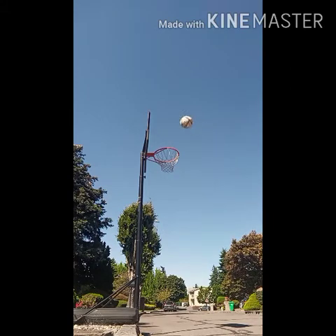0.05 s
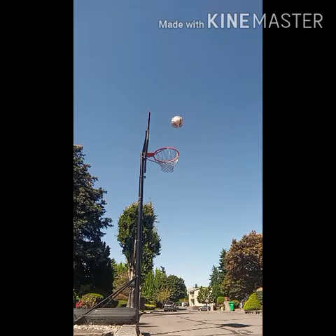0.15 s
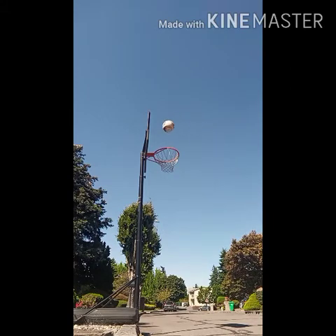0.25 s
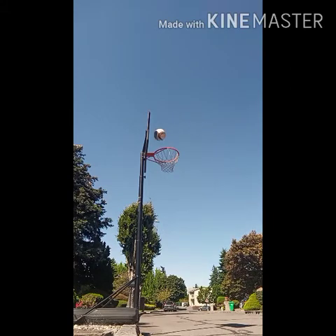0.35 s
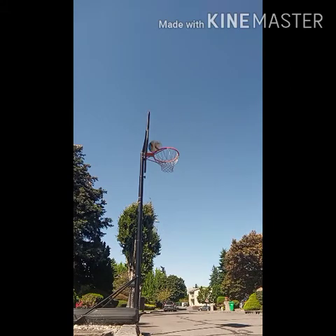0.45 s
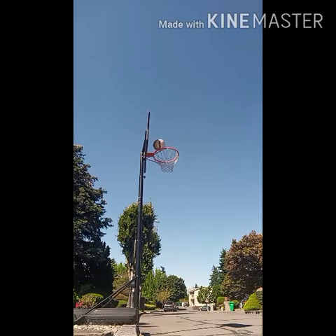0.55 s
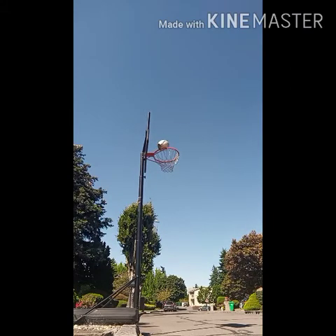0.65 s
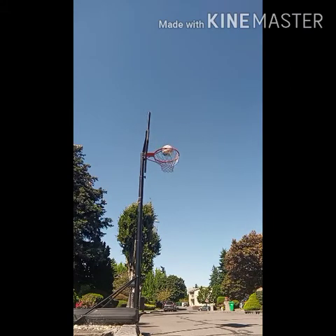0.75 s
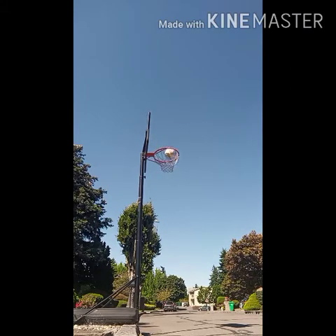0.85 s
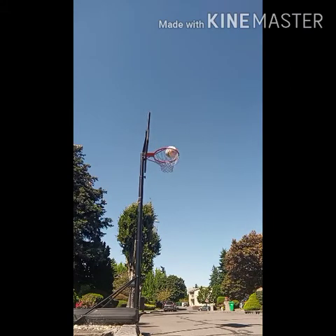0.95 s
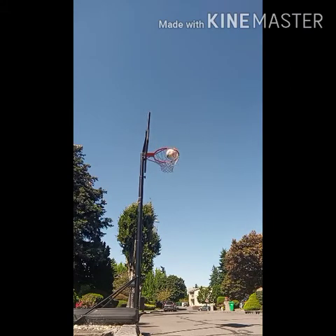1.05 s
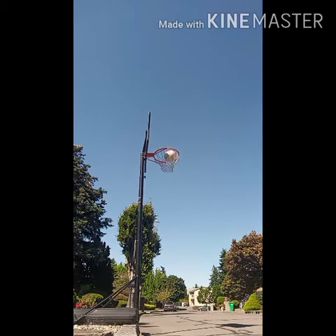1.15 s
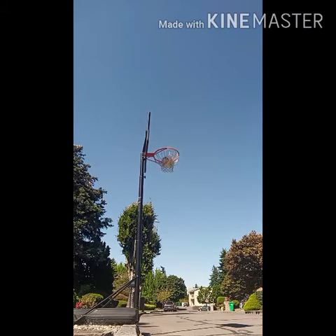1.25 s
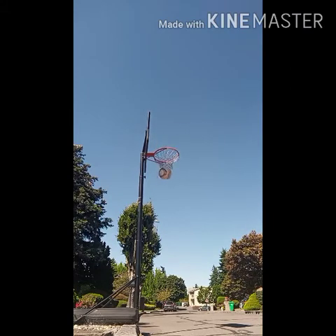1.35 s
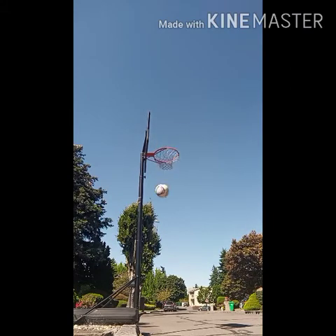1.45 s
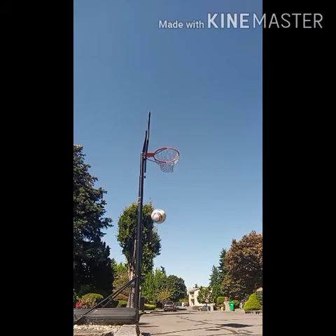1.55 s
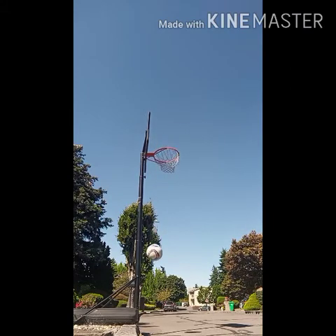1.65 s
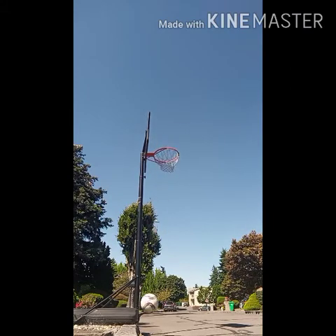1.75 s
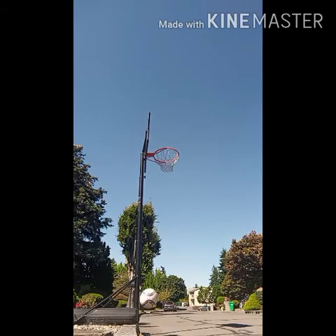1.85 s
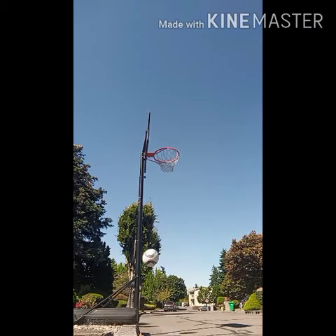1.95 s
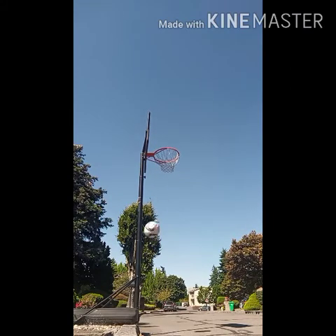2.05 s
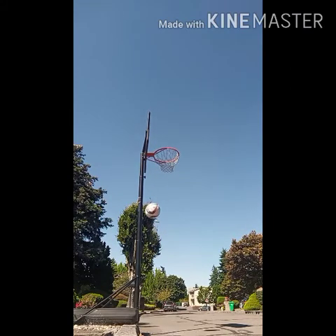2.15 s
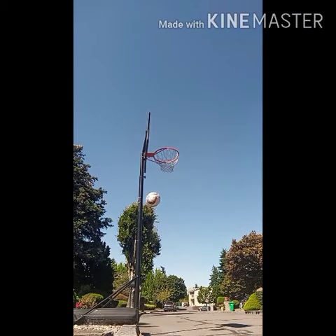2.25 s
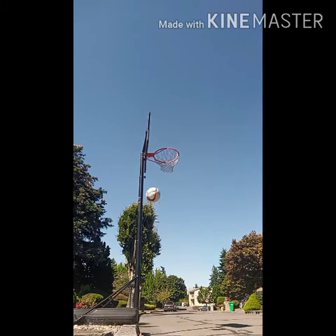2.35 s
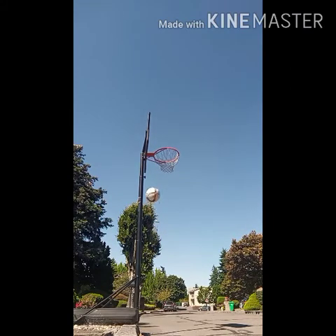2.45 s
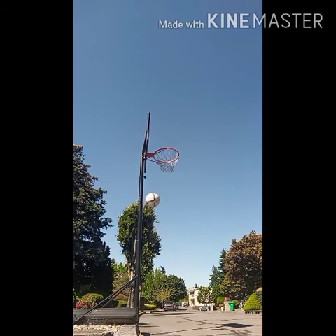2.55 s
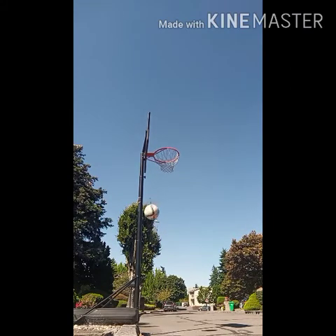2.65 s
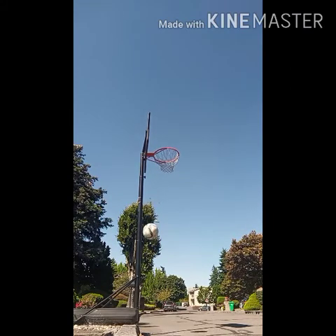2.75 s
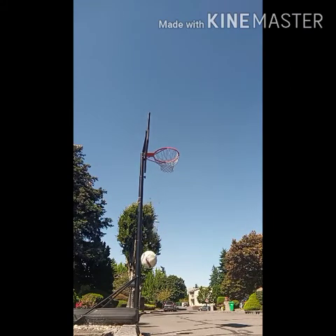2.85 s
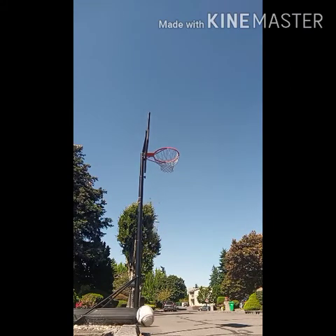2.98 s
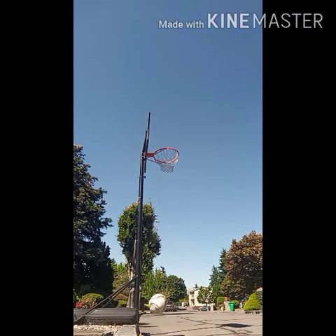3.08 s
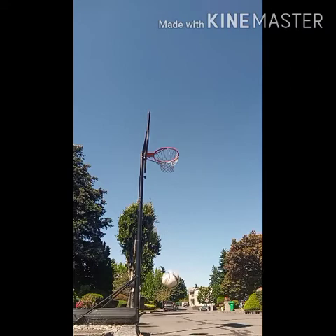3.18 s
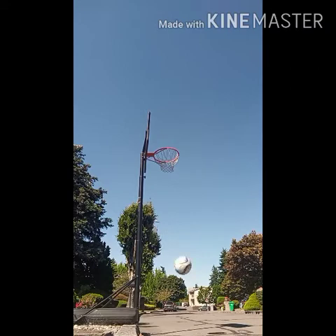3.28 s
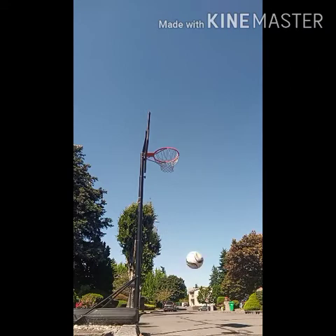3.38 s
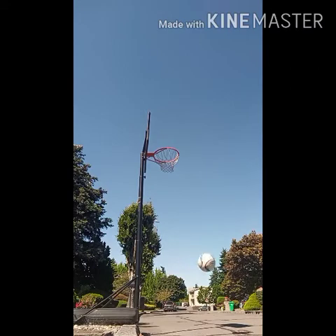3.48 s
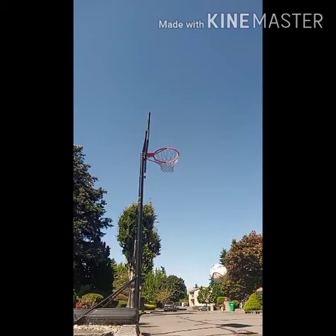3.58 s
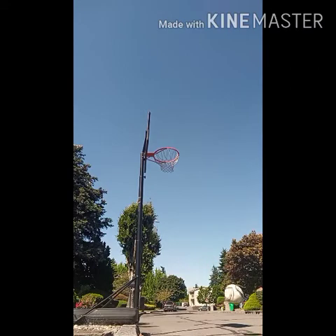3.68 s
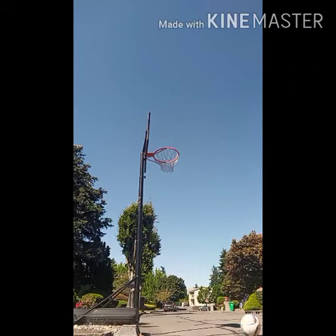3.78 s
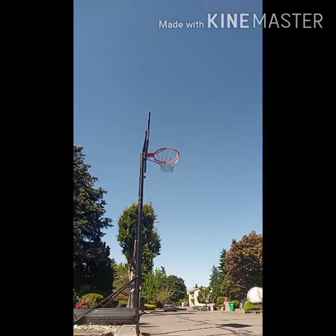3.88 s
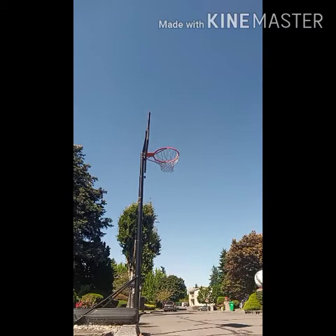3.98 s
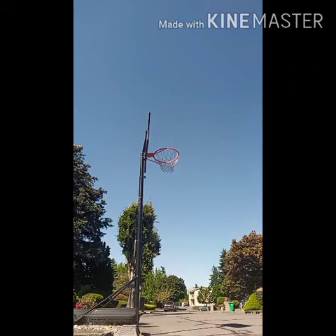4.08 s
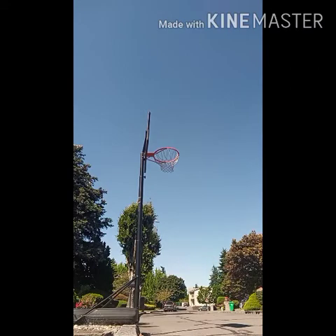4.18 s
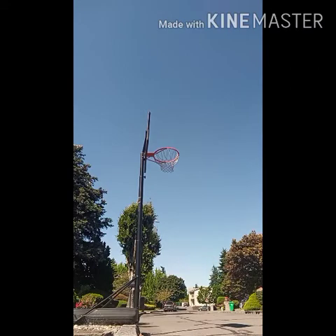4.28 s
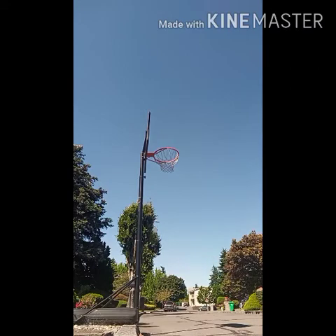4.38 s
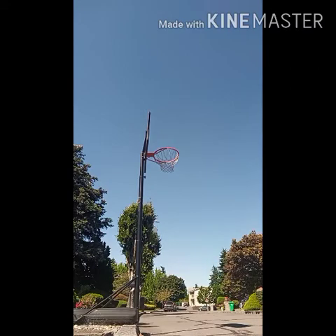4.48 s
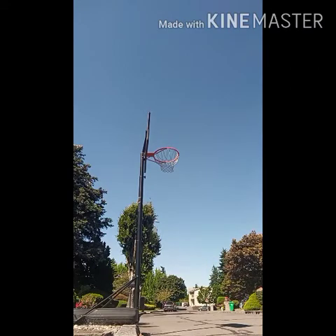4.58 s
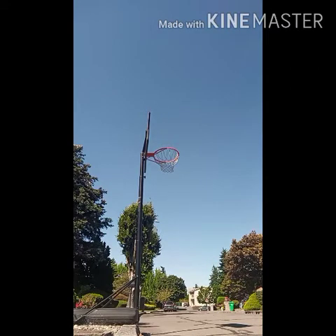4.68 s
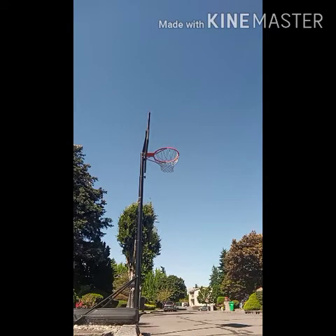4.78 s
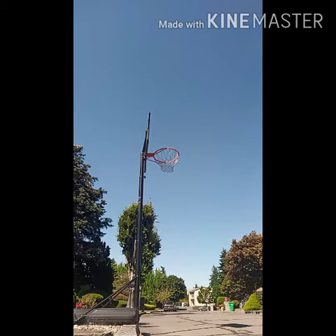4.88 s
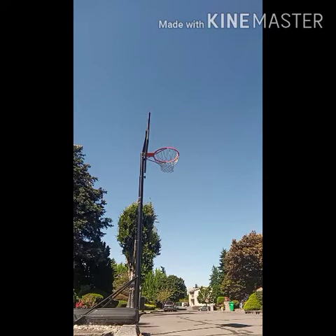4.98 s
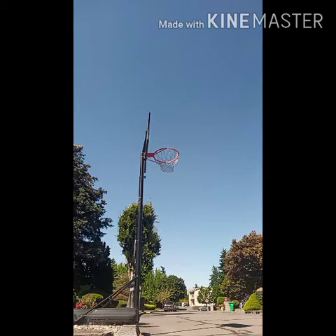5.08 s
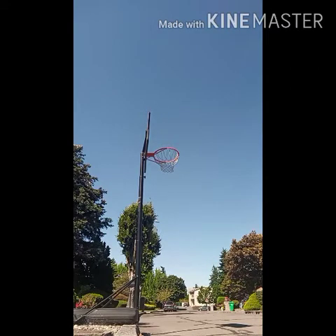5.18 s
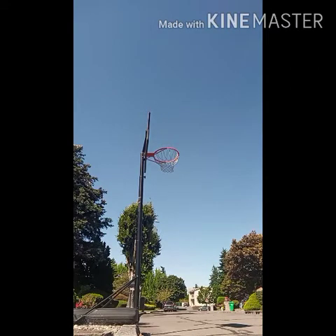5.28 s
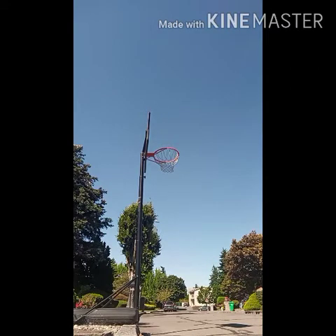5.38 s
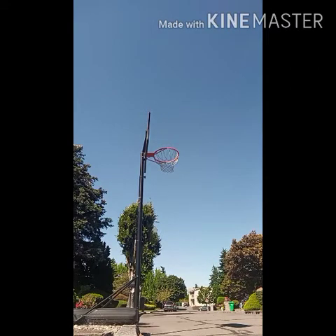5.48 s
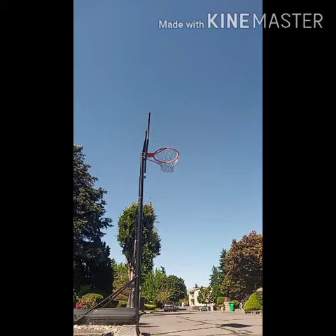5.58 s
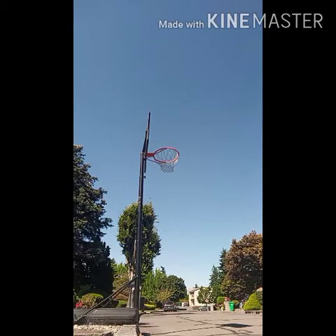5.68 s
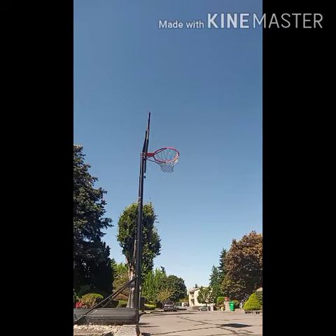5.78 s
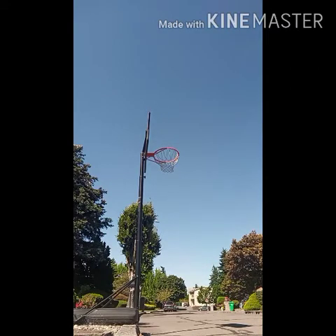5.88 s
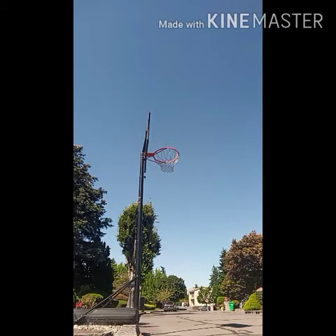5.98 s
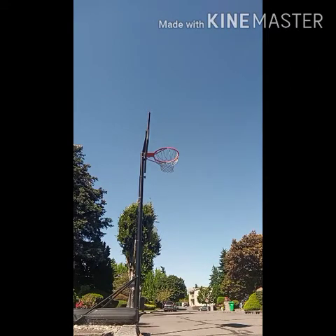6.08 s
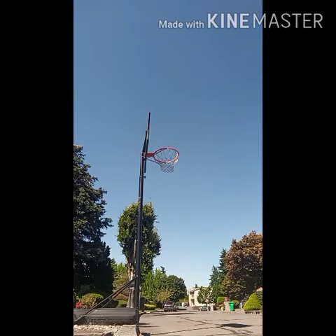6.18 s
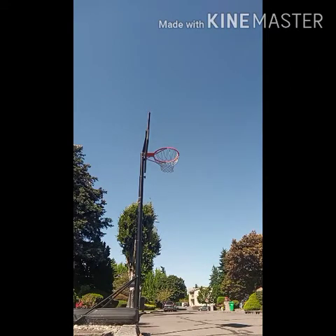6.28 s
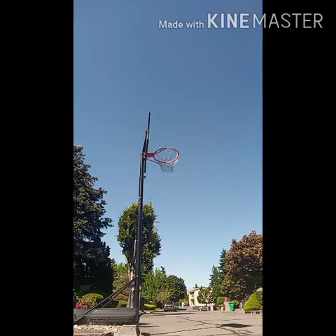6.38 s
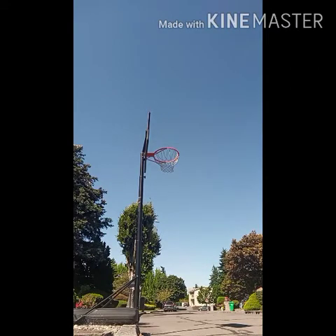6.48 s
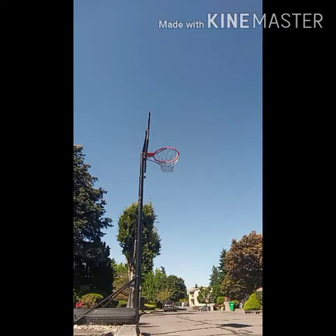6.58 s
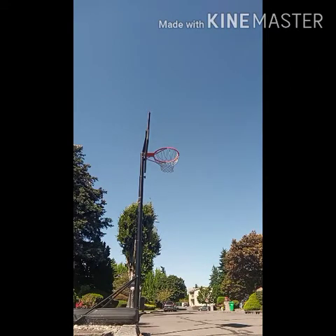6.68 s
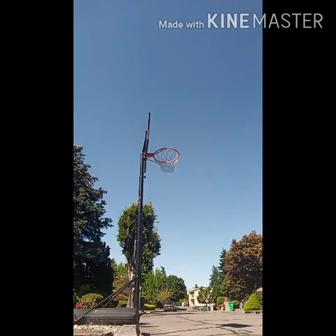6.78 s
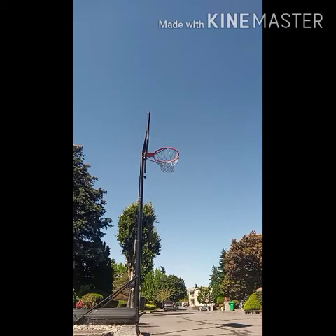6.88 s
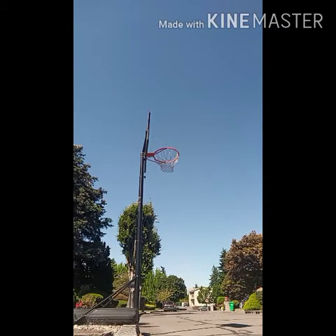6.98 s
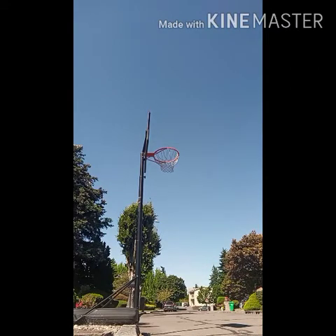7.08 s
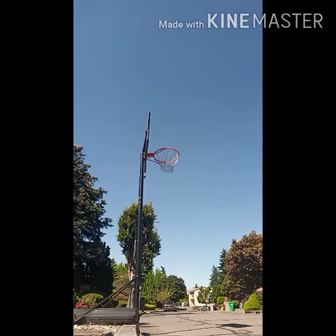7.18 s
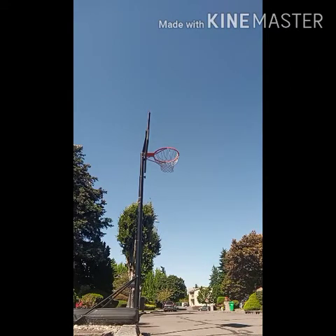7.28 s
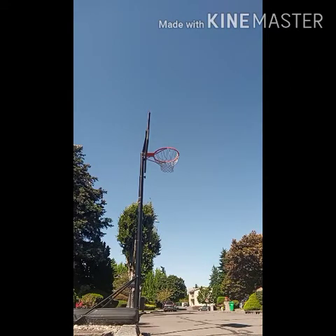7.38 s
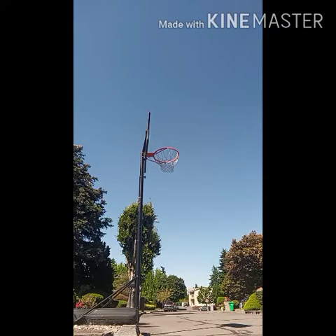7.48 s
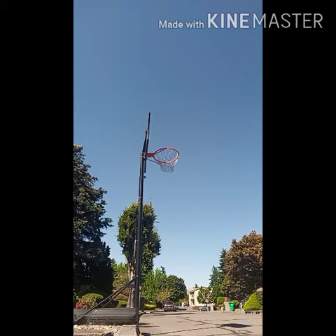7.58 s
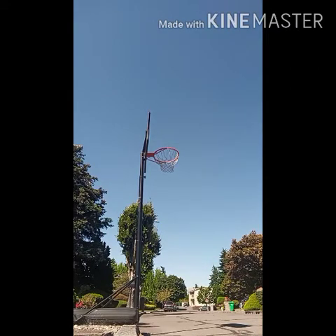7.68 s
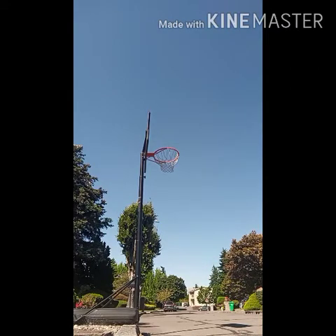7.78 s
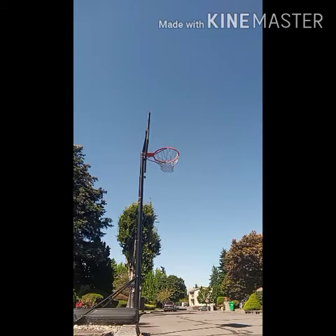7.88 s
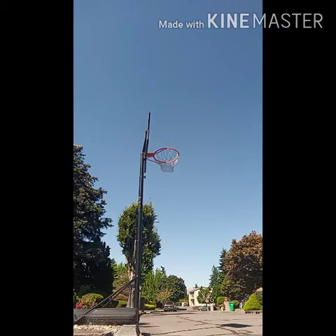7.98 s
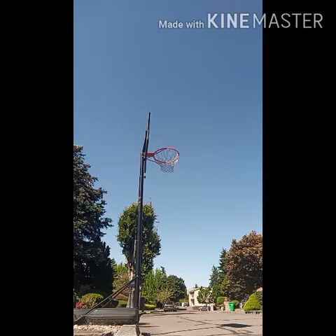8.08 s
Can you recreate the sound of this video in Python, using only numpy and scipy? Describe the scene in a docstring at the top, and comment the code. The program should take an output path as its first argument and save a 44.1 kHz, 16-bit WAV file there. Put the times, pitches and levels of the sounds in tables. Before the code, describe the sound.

A quiet paved street outdoors, with low distant traffic swelling gently and faint microphone hiss throughout. At about 0.5 s a ball strikes the hoop: dull board knocks and a loose metallic rattle until 0.7, then a brighter, stronger clank near 0.97 trailing into soft net and rim jingling until 1.4. A near-silent drop follows. At 1.9 the ball lands with the loudest slap, a crisp smack over a short low thump, with house-front echoes. Around 3.1 a dry knock, scuffing hiss and softer landing shake the stand, which rattles until 3.5. Further hollow bounces come at 3.9, 4.6, 4.95, 5.8, 6.5, 6.9, 7.3, 7.7 and 8.0, generally weaker and finally closer together. Sharp hard knocks stand out at 4.4 and 6.45, with fainter ones later. Small hissy scuffs appear, and the echo grows as the ball recedes.

```python
"""Far traffic hums throughout as filtered noise. A ball rattles through a hoop on a stand: bursts
of noise ring the steel and the board. It drops and bounces away over a paved street, each bounce
a slap, a low thump and a softer slap, with dry knocks in between. The hoop shakes once more, short
soft bursts of hissy noise come now and then, and house fronts send slaps and knocks back."""
import sys
import numpy as np
from scipy import signal
from scipy.fft import rfft, irfft
from scipy.io import wavfile
from scipy.ndimage import uniform_filter1d

SR = 44100
rng = np.random.default_rng(int(sys.argv[2]) if len(sys.argv) > 2 else 0)


def wav_record(signal):
    """Record a signal, one row per channel, as 16-bit PCM in the file named by sys.argv[1]."""
    frames = np.transpose(np.atleast_2d(signal))
    bounded = np.clip(frames, -1, 1)
    # unit amplitude maps onto the largest positive 16-bit level
    quanta = np.round(bounded * 32767).astype(np.int16)
    wavfile.write(sys.argv[1], SR, quanta)


N = 358974

# thin, very high fizz, peaking near 15 kHz: (frequency [Hz], relative level per Hz [dB])
FIZZ = [(4410, -31.5), (7500, -4), (8460, -5), (11900, -9), (13500, -16), (14600, -4), (15000, -9.5),
        (15600, 0), (16300, -19)]


def amp(db):
    """Turns decibels into a gain."""
    return 10 ** (np.asarray(db) / 20)


def evened(x):
    """Scales a sound to an rms (average strength) of one."""
    return x / np.sqrt(np.mean(x ** 2) + 1e-20)


def read(points, hz):
    """Reads levels between the points of a table, on a log frequency axis."""
    table_hz, value = np.transpose(points)
    return np.interp(np.log(hz + 0.0016), np.log(table_hz), value)


def add(mix, s, sound):
    """Mixes a sound in at time s, in seconds."""
    part = mix[round(s * SR):][:len(sound)]
    part += sound[:len(part)]


def coloured(x, points):
    """Shapes x by a spectrum table and silences everything outside the table."""
    hz = np.fft.rfftfreq(len(x), 1 / SR)
    inside = (hz > points[0][0]) & (hz < points[-1][0])
    return irfft(rfft(x) * amp(read(points, hz)) * inside, len(x))


def uneven(x, uneven_db, width_hz=320):
    """Puts random bumps across the spectrum, so no two events share quite the same colour."""
    hz = np.fft.rfftfreq(len(x), 1 / SR)
    bumps = np.interp(hz / width_hz, np.arange(200), rng.standard_normal(200))
    return irfft(rfft(x) * amp(uneven_db * bumps), len(x))


def patchy(points, patch_db):
    """Makes steady noise whose spectrum drifts in patches of time and frequency."""
    frames, hz = N // 256 + 5, np.fft.rfftfreq(1024, 1 / SR)
    real, imag, patches = rng.standard_normal((frames, 513, 3)).T
    patches = uniform_filter1d(patches, size=3, axis=0)  # smooth over frequency
    patches = evened(uniform_filter1d(patches, size=8, axis=1))  # smooth over time
    level_db = read(points, hz)[:, None] + patch_db * patches
    below_top = (hz < points[-1][0])[:, None]
    spectrum = (real + 1j * imag) * amp(level_db) * below_top
    return evened(signal.istft(spectrum, nperseg=1024, noverlap=768)[1][:N])


def fade(t, t60, hold=0, rise=0.00047):
    """Rises quickly, holds until time hold, then falls by 60 dB in t60 (at least 2 ms)."""
    return np.clip(t / rise, 0, 1) * amp(-60 * np.maximum(t - hold, 0) / max(t60, .002))


def ringing(x, modes):
    """Sends x through resonances, each a natural pitch that rings longer the narrower it is."""
    total = 0
    for hz, width_hz, db in modes:
        radius = np.exp(-np.pi * width_hz / SR)
        angle = 2 * np.pi * hz / SR
        ring = signal.lfilter([1], [1, -2 * radius * np.cos(angle), radius * radius], x)
        total = total + amp(db) * (1 - radius) * np.sin(angle) * ring
    return total


def traffic():
    """Tyre roar from two roads swells and sinks over a low rumble."""
    # far traffic: (time [s], tyre roar [dB], duller roar [dB])
    swells = [(0, -60, -67.5), (.5, -59, -63.5), (1.1, -58, -67.5), (1.52, -56.5, -60.5),
              (1.8, -60.5, -74.5), (2.1, -59.5, -55), (2.4, -61.5, -58), (2.74, -63.5, -58),
              (3.001, -61.5, -63), (3.3, -60, -58), (3.7, -62.5, -67.5), (4.3, -59, -67.5),
              (4.901, -64, -74), (5.4, -65, -72), (6.251, -66, -70), (6.699, -62, -65), (7.499, -58.5, -66),
              (8.14, -59.5, -63.5)]
    # colours of the two roars and the rumble: (frequency [Hz], relative level per Hz [dB])
    roar_colour = [(290, -47), (500, -22.5), (632, -16.5), (833, -1.5), (924, 2), (1040, 3.5), (1440, -8),
                   (1570, -27), (2600, -48), (3380, -66.5), (5720, -120)]
    dull_colour = [(300, -26), (450, -13), (540, -6.5), (640, -5.5), (760, 0), (880, -2.5), (1000, -14.5),
                   (1300, -27)]
    rumble_colour = [(12, -50), (20, -20.5), (86, 8.5), (195, 6), (258, -5.5), (343, 1.5), (512, -13),
                     (700, -25), (910, -38.5), (1540, -120)]
    s, roar_db, dull_db = np.transpose(swells)
    t = np.arange(N) / SR
    roar = amp(np.interp(t, s, roar_db)) * patchy(roar_colour, patch_db=4.0)
    dull_roar = amp(np.interp(t, s, dull_db)) * patchy(dull_colour, patch_db=6.0)
    rumble = amp(-69.5) * patchy(rumble_colour, patch_db=3.0)
    return roar + dull_roar + rumble


def echo(sound, near_db, far_db):
    """Adds house-front echoes: each wall scatters the sound back as a decaying cloud of noise."""
    # near and far house fronts: (delay [ms], relative level [dB], t60 of the scattered return [ms])
    near_walls = [(9.9, 1.5, 110), (21.3, 4, 90), (58.7, -6, 116)]
    far_walls = [(92, -19.5, 380), (131, -22, 270), (263, -24, 190)]
    # colour of the echo: (frequency [Hz], relative level [dB])
    street = [(60, -4.5), (150, 0.5), (500, 5), (1200, -2), (2000, 0.5), (2800, 1.5), (4200, 3),
              (5400, 1.5), (6600, 4.5), (8000, 4), (12000, -6)]
    t = np.arange(SR // 2) / SR
    walls = [(ms, db + near_db, t60_ms) for ms, db, t60_ms in near_walls]
    walls += [(ms, db + far_db, t60_ms) for ms, db, t60_ms in far_walls]
    power = sum((amp(db) * fade(t - ms / 1000, t60_ms / 1000, rise=0.0078)) ** 2
                for ms, db, t60_ms in walls)
    cloud = coloured(rng.standard_normal(len(t)), street)
    tail = evened(uneven(cloud, uneven_db=1.5)) * np.sqrt(power)
    wet = amp(-32) * signal.fftconvolve(sound, tail)
    wet[:len(sound)] += sound  # the direct sound
    return wet


def wetter_db(s):
    """Raises the echo as the ball goes off toward the houses."""
    away_s, rise_db_per_s = 5.4, 1.5
    return rise_db_per_s * max(s - away_s, 0)


def shaken(rows, bright, rise_s, t60, fizz_db, lumpy_db):
    """Each event drives three streams of noise: bright and lumpy, slow and low, quick fizz."""
    soft_rise = .15  # share of the hold: long events start gently
    out = np.zeros((3, N))
    t = np.arange(SR // 3) / SR
    for s, high_db, low_db, centre_hz, hold_ms in rows:
        high, low, fizz, lumps = rng.standard_normal((4, len(t)))
        rise = rise_s + soft_rise * hold_ms / 1000
        hold = rise + hold_ms / 1000
        # each event has its own colour around its centre
        part = [(centre_hz / 4, -30), (centre_hz / 1.5, -9), (centre_hz, 0),
                (centre_hz * 1.5, -5), (centre_hz * 5, -16)]
        high = coloured(coloured(high, part), bright)
        high = evened(uneven(high, uneven_db=4))
        lumps = amp(lumpy_db * evened(uniform_filter1d(lumps, 100)))
        add(out[0], s, amp(high_db) * high * lumps * fade(t, t60, hold, rise))
        add(out[1], s, amp(low_db) * low * fade(t, 1.8 * t60, hold, rise + 0.0013))
        add(out[2], s, amp(high_db + fizz_db) * fizz * fade(t, 0.72 * t60, hold, rise))
    return out


def hissy_bursts():
    """Short soft bursts of hissy noise, some with a dull low part."""
    # bursts: (time [s], hiss [dB], relative level of the low part [dB],
    # centre of the hiss filter [Hz], hold [ms])
    bursts = [(1.82, -77.5, -54.5, 5700, 4.3), (3.089, -61, -41, 5400, 16.5), (3.338, -77, -63.5, 6200, 4.),
              (3.367, -63.5, -59.5, 5500, 15), (4.385, -82.5, -86, 5000, 47), (4.817, -70.5, -64, 5740, 5),
              (4.835, -67, -57.5, 5350, 7.6), (5.897, -73.5, -74, 4300, 11.3), (6.43, -84, -69, 5050, 14),
              (7.12, -83, -71, 4500, 5), (7.185, -83, -69, 4900, 31)]
    # colours of the hiss and the low part: (frequency [Hz], relative level per Hz [dB])
    hiss_colour = [(1060, -11), (1800, 33.5), (2250, -109), (2490, 8.5), (5500, -1), (6430, 5), (7260, -31),
                   (9000, -4), (11700, -56), (19800, -120)]
    low_colour = [(60, -19.5), (120, 5), (250, -27), (500, -11.5), (1200, -17.5), (2000, -37)]
    high, low, fizz = shaken(bursts, hiss_colour, rise_s=0.0013, t60=0.077, fizz_db=-6, lumpy_db=4.0)
    return high + amp(17.5) * coloured(low, low_colour) + coloured(fizz, FIZZ)


def hoop():
    """Chattering joints ring the steel and the board, which sound on after each shake."""
    # hoop, net and stand shaken by the ball: (time [s], relative rattle level [dB],
    # relative board level [dB], centre of the rattle filter [Hz], hold [ms])
    shakes = [(0.5299, -45.5, -57, 3200, 11), (0.5666, -42.5, -43, 3740, 9.5), (0.583, -58, -42, 4500, 14),
              (0.62, -54.5, -42.5, 4200, 25), (0.6654, -44.5, -49, 3780, 7.4), (0.7044, -58, -81, 3980, 12),
              (0.9213, -54, -52.5, 5400, 14), (0.9376, -50, -50.5, 4960, 9.4),
              (0.9698, -39.5, -44, 3770, 31), (0.9836, -32.5, -36.5, 5220, 10.5),
              (1.031, -47, -45, 3400, 13), (1.0934, -53, -78, 4650, 27), (1.1444, -57, -73, 4800, 46),
              (1.1775, -63, -74, 6400, 14), (1.2333, -56.5, -67, 3620, 14), (1.297, -62, -63, 4400, 6.3),
              (1.347, -61, -71, 4180, 27), (1.392, -51, -61, 3990, 3.6), (3.1347, -62, -37.5, 3070, 3.6),
              (3.185, -77, -70, 5500, 40), (3.2714, -65, -45.5, 3420, 29), (3.302, -63.5, -51.5, 3380, 8.2),
              (3.478, -68.5, -69, 5030, 48)]
    # unpitched part of the rattle, then its fizz: (frequency [Hz], relative level per Hz [dB])
    clatter = [(1060, 31), (1800, 7), (1960, -54), (2030, -20.5), (2660, -4.5), (3130, -9), (6090, -12.5),
               (8190, -25), (9000, -19.5), (11700, -39), (19800, -120)]
    fizz_colour = [(4120, -37), (7000, -4.5), (7700, 0), (8240, -23), (9590, -16), (10400, -19),
                   (12800, -31), (14300, -28), (15200, -12), (16000, -8.5), (16300, -46)]
    # steel ring and brackets, then board and pole: (frequency [Hz], width [Hz], relative level [dB])
    rim = [(2640, 29.5, 0), (3510, 24, 0), (3390, 10.6, 16), (3930, 37, 6.5), (3940, 14, -14),
           (4160, 18, 7), (4810, 31, 3), (5180, 25, 4), (5270, 40, -21), (5530, 54, -4), (5500, 16, -1),
           (5700, 21.4, 11), (6320, 23, -5.5), (6570, 89, 11.5), (6460, 45, -1.5), (7500, 40, -31),
           (8940, 37, -18.5), (9300, 50, -28.5)]
    board_modes = [(139, 36.6, -11), (178, 49, 2), (242, 66, 0.5), (342, 61, -6), (386, 23, -4),
                   (564, 140, -12), (793, 80, -5)]
    # what a soft ball can push into the board: (frequency [Hz], relative level [dB])
    shove = [(70, -29), (120, -7), (900, -8), (1500, -30)]
    high, low, fizz = shaken(shakes, clatter, rise_s=0.00086, t60=0.13, fizz_db=-26.5, lumpy_db=3.5)
    steel = high + amp(3) * ringing(high, rim)
    board = ringing(coloured(low, shove), board_modes)
    return amp(-12.5) * steel + amp(23.0) * board + coloured(fizz, fizz_colour)


def slap(modes, ring_db, crack_db, fizz_db=-120, pitch=1, rise=0.00028, pressed=0):
    """A brief ring under a crack of two surfaces meeting; a faint crunch lasts while they are pressed."""
    # colour of the crack: (frequency [Hz], relative level per Hz [dB])
    crack_colour = [(1120, -18), (1900, -28.5), (2100, -50.5), (2600, 6), (3140, 0), (3730, 1.5), (4590, 2),
                    (6120, 3.5), (8090, -28), (11800, -28.5), (13300, -61), (14900, -31.5), (16300, -34.5)]
    t = np.arange(4096) / SR
    detune = 1 + .03 * rng.standard_normal(len(modes))
    ring = sum(amp(db) * np.sin(2 * np.pi * hz * pitch * d * t) * fade(t, t60, rise, rise)
               for (hz, db, t60), d in zip(modes, detune))
    # soft rubber rounds the first edge
    ring = signal.sosfilt(signal.butter(2, 3200, fs=SR, output="sos"), ring)
    crack_noise, fizz_noise = rng.standard_normal((2, len(t)))
    crunch = fade(t, 0.0091, rise, rise) + amp(-20.0) * fade(t, 0.013, pressed)
    crack = evened(coloured(crack_noise, crack_colour)) * crunch
    fizz = evened(coloured(fizz_noise, FIZZ)) * fade(t, 0.04)
    return amp(ring_db) * ring + amp(crack_db) * crack + amp(fizz_db) * fizz


def knocks(mix):
    """Adds dry knocks without a thump, on the board first, later on something hard and light."""
    # knocks: (time [s], knock [dB], crack [dB], pitch factor)
    hits = [(0.5338, -40, -54, 1.15), (.541, -39.5, -75, 1.25), (.668, -47, -48.5, 0.78),
            (0.968, -44.5, -59, 1.07), (3.0986, -38, -55, 1.1), (4.4169, -26, -41, 1.15),
            (6.4554, -30, -55, 1.14), (6.724, -53, -55.5, 1.19), (7.2194, -41, -77, 0.88),
            (7.477, -58, -60, 1.1)]
    # ring of the thing struck, before the pitch factor: (frequency [Hz], relative level [dB], t60 [s])
    knock_modes = [(400, -11.5, 0.0038), (570, -5, 0.015), (767, 2, 0.0085), (1306, -5, 0.02)]
    for s, knock_db, crack_db, pitch in hits:
        echo_db = -13 + wetter_db(s)
        knock = slap(knock_modes, knock_db, crack_db, pitch=pitch, rise=0.00105)
        add(mix, s, echo(knock, echo_db, echo_db))


def bounce(slap_db, thump_db, thump_hz, overtone_db, crack_db, fizz_db, contact_ms):
    """Slap on landing, a thump as the ball squashes and springs back, a softer slap as it peels off."""
    # air and skin of the ball: (frequency [Hz], relative level [dB], t60 [s])
    ball_modes = [(1252, 1.5, 0.013), (976, -9, 0.036), (1588, -20.5, 0.084), (457.3, -16, 0.069),
                  (680, -12.5, 0.023)]
    t = np.arange(4096) / SR
    peel_s = contact_ms / 1000 - .0008  # peeling starts just before contact ends
    lift_db = -6.5 - (contact_ms - 8.5)  # softer by 1 dB for each ms of longer contact
    sound = slap(ball_modes, slap_db, crack_db, fizz_db, pressed=peel_s)
    turn = 2 * np.pi * thump_hz * np.maximum(t - .0007, 0)  # the squash builds just after the slap
    thump = np.sin(turn) * fade(t, t60=0.013, hold=0.011, rise=.002)
    # the skin stiffens as it flattens, which adds an octave
    overtone = amp(overtone_db) * np.sin(2 * turn) * fade(t, 0.046, 0.0051)
    sound -= amp(thump_db) * (thump + overtone)
    peel = slap(ball_modes, slap_db + lift_db + 5.0, crack_db + lift_db, fizz_db + lift_db,
                pitch=0.897, rise=0.001)
    add(sound, peel_s, peel)
    return sound


def bounces(mix):
    """Adds the ball striking the pavement, each bounce with its echo from the houses."""
    # ball on pavement: (time [s], slap [dB], thump [dB], thump pitch [Hz],
    # octave relative to the thump [dB], crack [dB], fizz [dB], contact [ms])
    landings = [(1.9147, -16, -21.5, 129, -26.5, -30, -71, 9.9),
                (3.1181, -32.5, -29, 130, -17, -47, -77, 7.9),
                (3.9085, -29.5, -34, 110.4, -14, -38, -59, 11.2),
                (4.594, -32.5, -35.5, 112, -30, -38, -65.5, 9.7),
                (4.9491, -26, -29.5, 119, -4.5, -33, -53.5, 9.9),
                (5.7675, -30, -35, 113, -31, -39, -72, 10.1),
                (6.468, -37.5, -36.5, 122, -26, -46.5, -79, 10.3),
                (6.9066, -30.5, -35.5, 110, -7.5, -44, -89, 9.3),
                (7.3008, -31.5, -33, 111.6, -6.5, -42.5, -85.5, 11.5),
                (7.6814, -41.5, -38.5, 117.4, -4.5, -47, -94, 10.2),
                (8.0383, -36, -36, 110.5, -6.5, -44.5, -91.5, 10.5)]
    for s, *row in landings:
        near_db, far_db = -14.5 + wetter_db(s), -12 + wetter_db(s)
        add(mix, s, echo(bounce(*row), near_db, far_db))


def scene():
    """Mixes the street, hissy bursts, hoop, knocks and bouncing ball."""
    mix = traffic() + hissy_bursts() + hoop()
    knocks(mix)
    bounces(mix)
    return mix[None]


def record(dry):
    """Adds microphone hiss, rolls off the bass, then cuts the highest treble."""
    # colour of the microphone hiss: (frequency [Hz], relative level per Hz [dB])
    hiss_colour = [(880, -31), (1500, 1.5), (2000, -18.5), (3170, -21), (6380, -27), (7870, -36),
                   (13500, -35), (14900, -26), (15700, -28), (16300, -44)]
    hiss = amp(-78.5) * evened(coloured(rng.standard_normal(N), hiss_colour))
    thin = signal.sosfilt(signal.butter(3, 60, "high", fs=SR, output="sos"), dry + hiss)
    edge_hz = 16470  # top of the band
    band_limit = signal.firwin(511, edge_hz, window=("kaiser", 9), fs=SR)
    return signal.oaconvolve(thin, band_limit[None], "same")


dry = scene()
out = record(dry)
wav_record(out)
```